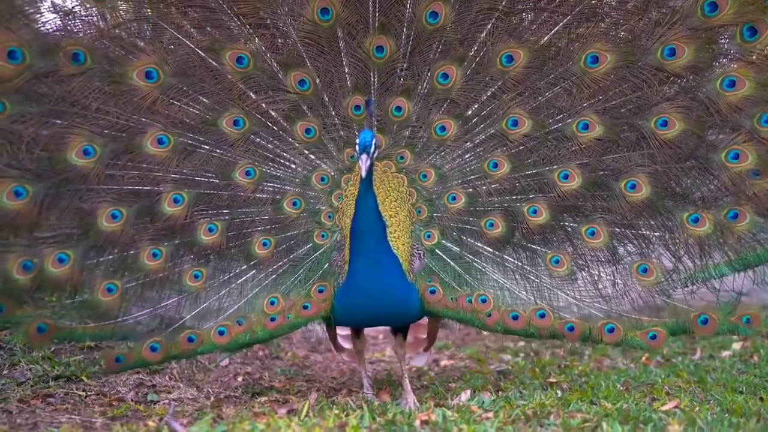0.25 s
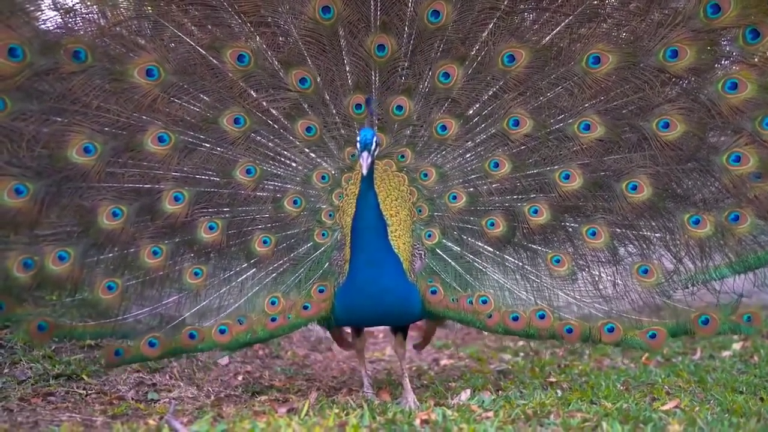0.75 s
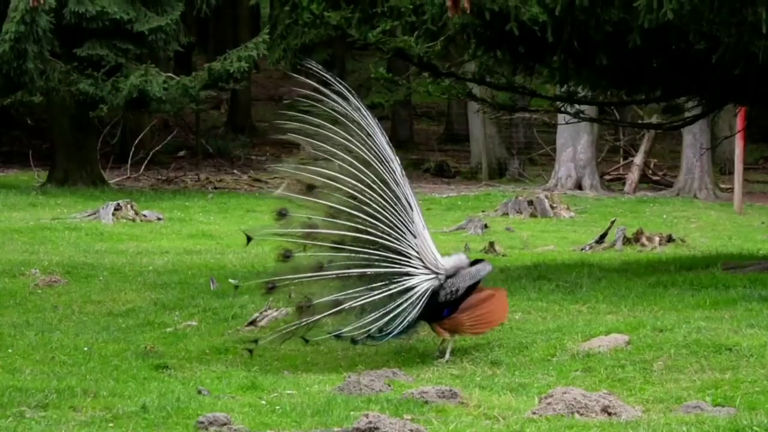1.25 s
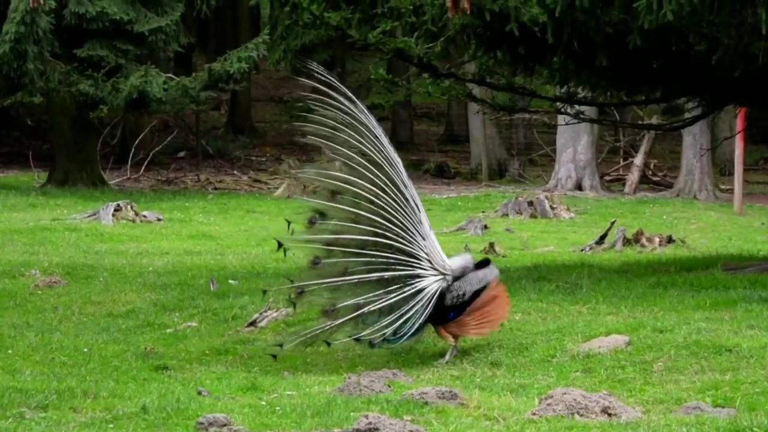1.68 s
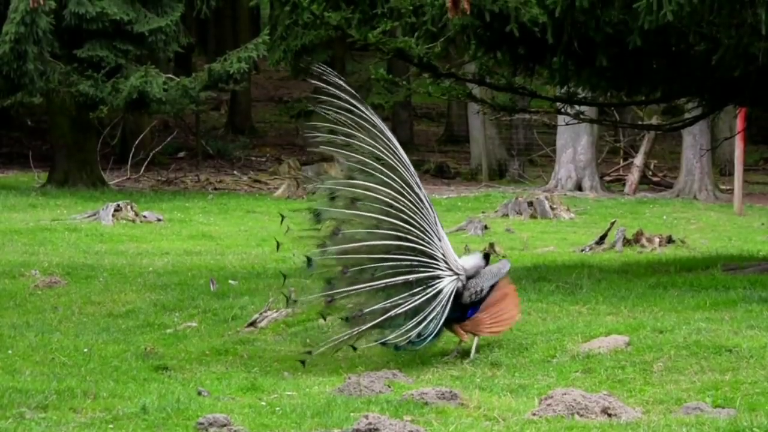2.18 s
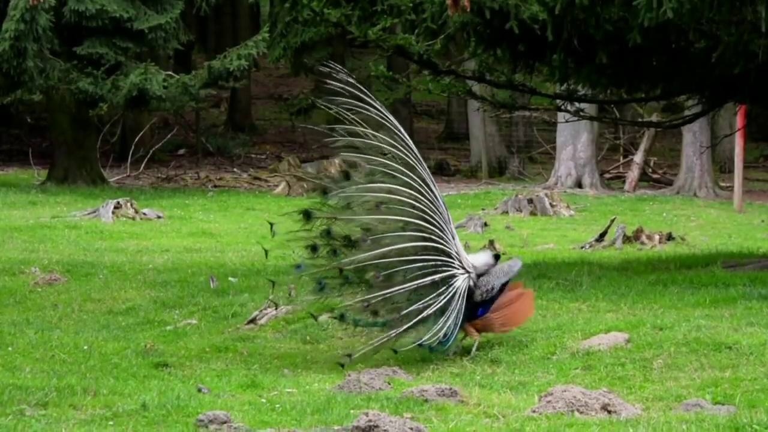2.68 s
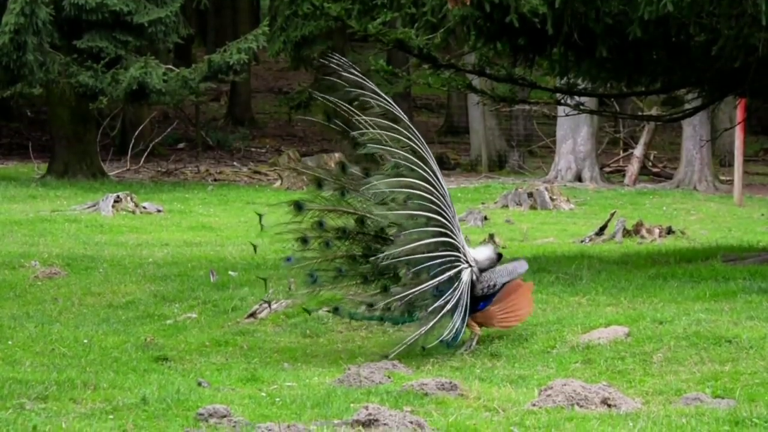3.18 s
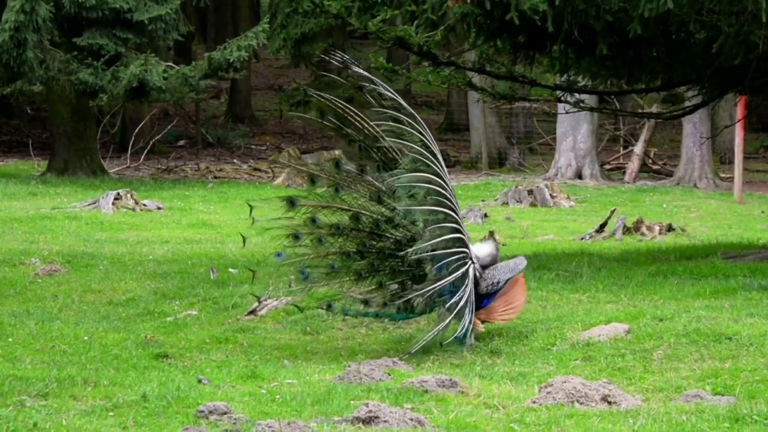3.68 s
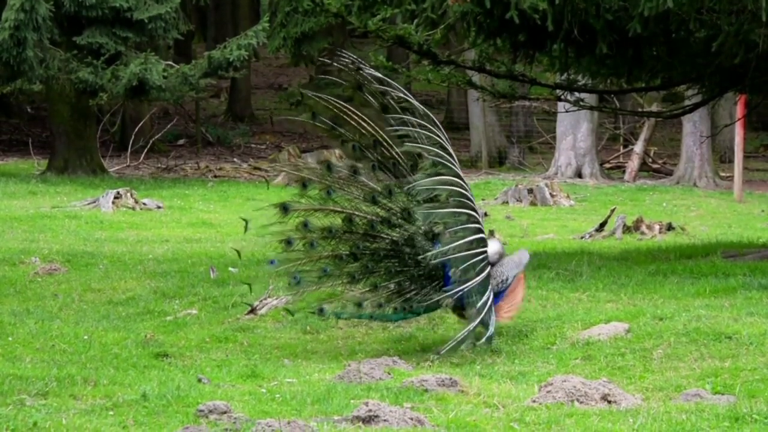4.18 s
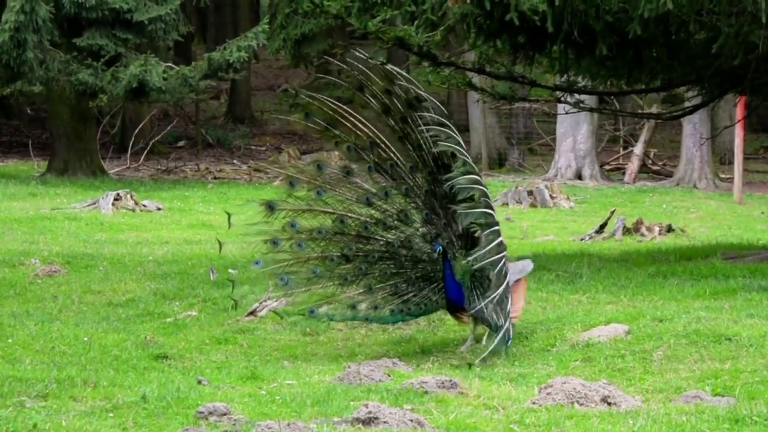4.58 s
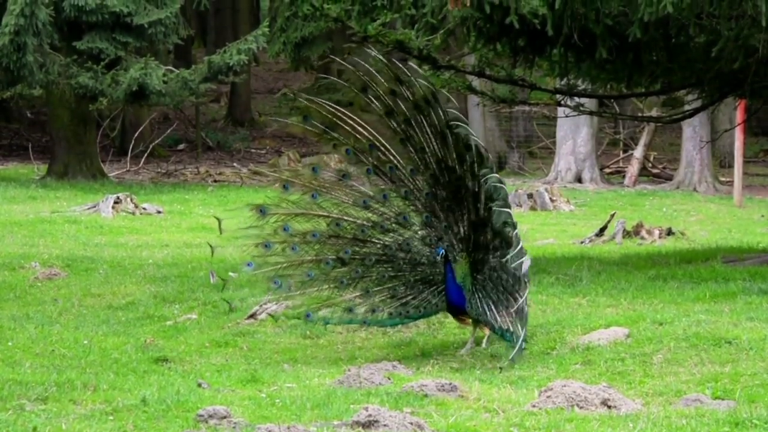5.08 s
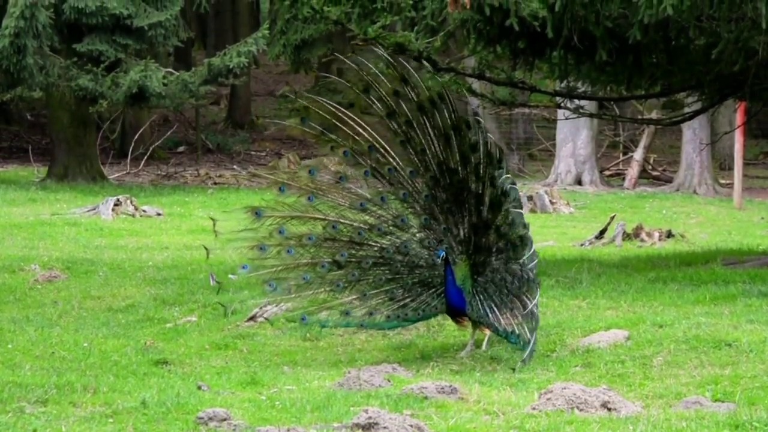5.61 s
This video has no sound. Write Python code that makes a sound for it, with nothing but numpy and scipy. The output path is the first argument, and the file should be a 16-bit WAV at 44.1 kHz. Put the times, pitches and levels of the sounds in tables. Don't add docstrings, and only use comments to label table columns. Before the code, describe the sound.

Close, centred peacock calls dominate: one long fluttering wail, four separate nasal yelps, then another wail trailing into hoarseness. A long, thin woodland echo follows each. Much quieter, slightly left, other peafowl call far away and small birds give reedy peeps and thin chirps. Soft wide traffic rumble and stirring leaves fill the open-air background.

```python
import sys
import numpy as np
from scipy import signal
from scipy.fft import rfft, irfft
from scipy.io import wavfile

SR = 44100
rng = np.random.default_rng(int(sys.argv[2]) if len(sys.argv) > 2 else 0)


def ratio_of_db(decibels):
    return 10 ** (np.asarray(decibels, float) / 20)


def unload_audio(sound):
    columns = np.transpose(np.atleast_2d(sound))
    steps = np.round(np.clip(columns, -1, 1) * 32767)
    wavfile.write(sys.argv[1], SR, steps.astype(np.int16))


N = 257984
T = np.arange(N) / SR


def rms1(x):
    return x / np.sqrt(np.mean(x ** 2))


def modes(hz, table):
    return sum(ratio_of_db(db) / (1 + (2 * (hz - f) / w) ** 2) for f, w, db in table)


def coloured(gain_at):
    spectrum = rfft(rng.standard_normal(N))
    return rms1(irfft(spectrum * gain_at(np.fft.rfftfreq(N, 1 / SR)), N))


def resonant_noise(table):
    return coloured(lambda f: modes(f, table))


def walk(rate_hz):
    return coloured(lambda f: 1 / (1 + (f / rate_hz) ** 2))


def bumps(rows):
    return sum(size * np.exp(-((T - s) / width) ** 2) for s, size, width in rows)


def read(table, fade_s=0.0023):
    s, *columns = np.transpose(table)
    span = slice(int(s[0] * SR), int(s[-1] * SR))
    t = T[span]
    gate = np.clip(np.minimum(t - s[0], s[-1] - t) / fade_s, 0, 1)
    return span, gate, [np.interp(t, s, c) for c in columns]


def running_phase(hz):
    return 2 * np.pi * np.cumsum(hz) / SR


# (time [s], pitch [Hz], level [dB], beak opening [dB], membrane slack [0-1])
WAIL_CONTOURS = [
    [(.017, 721, -8.5, -6, 1), (.07, 699, -10.5, -6.5, .15), (.13, 687, -11, -4, 0.17),
     (.39, 692.3, -13.5, 3.5, 0.19), (.6, 668, -13.5, 0, .45), (.7, 658, -13, -8.5, 1),
     (.88, 638.3, -14, -6, 0.97), (.97, 618.5, -23.5, -3, 0.94), (1.0, 620, -53.5, -12, 0.4)],
    [(3.56, 674, -26, -12, 0.6), (3.62, 709.7, -12, 0, 0.25), (3.85, 716, -14, 6, 0.01),
     (4.03, 708.1, -13, 4, 0.06), (4.27, 679.2, -14, -1, 0.73), (4.5, 645, -28, -1, 0.76),
     (4.74, 666, -31, -5, 0.89), (4.85, 657, -45, 3, 0.95), (5.06, 664, -54, 16, 0.86)],
]
# (multiple of pitch, level [dB])
WAIL_PARTIALS = [
    [(1, -13), (2, 0), (3, -35), (4, -20), (5, -30), (6, -29), (7, -40), (8, -37), (9, -42), (10, -37),
     (11, -49), (12, -45), (13, -37), (14, -61), (15, -34), (16, -33), (17, -41), (18, -43), (19, -41),
     (20, -39), (21, -36)],
    [(1, -14), (2, 0), (3, -28), (4, -16), (5, -21), (6, -21), (7, -23), (8, -33), (9, -29), (10, -25),
     (11, -30), (12, -38), (13, -33), (14, -49), (15, -51), (16, -59), (17, -58), (18, -67)],
]
# (first partial [dB], upper [dB], top [dB], beak share in first [0-1], in top [0-1])
WAIL_BALANCE = [(-14.5, -19.5, -21.5, 0.82, 0.03), (-18.5, -21, -23.5, 0.74, 0.75)]
# (slack pull [side lines], taut fall-off [dB/line], slack fall-off [dB/line],
#            taut hoarseness [0-1], slack hoarseness [0-1])
SLACK_LAWS = [(.75, 32, 7, .04, .06), (.65, 20, 2, .02, .25)]
PITCH_SWING = [.09, 0.15]
# (time [s], depth [dB], width [s])
VOICE_CATCHES = [(3.665, 2.5, 0.026), (3.93, 7.5, 0.02), (4.195, 5.5, 0.059), (4.34, 2.5, 0.037)]
# (centre [Hz], width [Hz], level [dB])
WINDPIPE = [(1240, 120, 11), (1857, 83, 7.5), (2583, 190, 12), (3000, 160, -5), (5280, 117, 5)]


def wail(i, flutter_start_rad, upper_hiss_db, top_hiss_db, breath_db, tones):
    span, gate, (hz, level_db, open_db, slack) = read(WAIL_CONTOURS[i])
    first_db, upper_db, top_db, first_share, top_share = WAIL_BALANCE[i]
    first_db = level_db + first_db + first_share * open_db
    upper_db = level_db + upper_db + open_db
    top_db = level_db + top_db + top_share * open_db

    slack_pull, taut_db, slack_db, taut_hoarse, slack_hoarse = SLACK_LAWS[i]
    taut_pull = .15
    pull = taut_pull + (slack_pull - taut_pull) * slack
    fall_db = np.clip(taut_db + (slack_db - taut_db) * slack, 1, 60)
    hoarse = np.clip(taut_hoarse + (slack_hoarse - taut_hoarse) * slack, 0, 1)

    settled_hz, extra_hz, settle_s = 44.53, 9.45, 0.275
    flutter_hz = settled_hz + extra_hz * np.exp(-(T[span] - T[span][0]) / settle_s)
    flutter = running_phase(flutter_hz) + flutter_start_rad + 4.7 * hoarse * walk(6.9)[span]
    phase = running_phase(hz) + hoarse * walk(33)[span]

    sides = np.arange(-4, 3)[:, None]
    waver_db = 25 * hoarse * np.array([walk(33)[span] for _ in sides])
    gain = ratio_of_db(-fall_db * (sides + pull) ** 2 + waver_db) + ratio_of_db(-34)
    second = np.sum(gain * np.sin(2 * phase + sides * flutter), axis=0)
    second = second / np.sqrt(np.sum(gain ** 2, axis=0))
    first = (1 + 0.21 * np.cos(flutter + 1.64)) * np.sin(phase + 0.033 * np.sin(flutter))

    groups = np.zeros((3, len(hz)))
    for k, k_db in WAIL_PARTIALS[i][2:]:
        throb = (1 + 0.38 * np.cos(flutter + 0.47 * k)) * ratio_of_db(3.86 * walk(4)[span])
        dull_db = 3 * slack * max(k - 4, 0)
        swung = k * phase + PITCH_SWING[i] * k * np.sin(flutter) + k * k
        groups[int(k > 3) + int(k > 10)] += ratio_of_db(k_db - dull_db) * throb * np.sin(swung)

    puffs = 1 + 0.55 * np.cos(flutter)
    upper_hiss = puffs * resonant_noise([(3000, 2300, -17), (5350, 1700, 4)])[span]
    top_hiss = puffs * resonant_noise([(12600, 3500, 0)])[span]
    upper_hiss_gain = ratio_of_db(upper_hiss_db) + 4 * hoarse ** 2 + .45 * np.clip(pull - .4, 0, 1)
    upper = rms1(groups[1]) + upper_hiss_gain * upper_hiss
    top = np.clip(1.2 - 2 * pull, .1, 1) * rms1(groups[2]) + ratio_of_db(top_hiss_db) * top_hiss
    breath = ratio_of_db(breath_db) * (1 + 8 * hoarse) * resonant_noise(WINDPIPE)[span]

    second_db = level_db - bumps(VOICE_CATCHES)[span]
    low = ratio_of_db(second_db) * (np.sqrt(2) * (second + groups[0]) + breath)
    low = low + np.sqrt(2) * ratio_of_db(first_db) * first
    fluttered_tones = (1 + 0.052 * np.cos(flutter)) * tones[span]
    high = ratio_of_db(upper_db + 0.9) * upper + ratio_of_db(top_db) * (ratio_of_db(-8.0) * top + fluttered_tones)
    out = np.zeros(N)
    out[span] = (low + high) * gate
    return out


# (centre [Hz], width [Hz], level [dB])
THROAT_MODES = [(760, 1700, -4.5), (1240, 163, 4), (1816, 177, 5), (2067, 117, 7.5), (2369, 214, 7),
                (2677, 63, 5.5), (3130, 315, -3.5), (3570, 136, -8.5), (4190, 404, -12)]
# (centre [Hz], width [Hz], depth [dB])
THROAT_POCKETS = [(1975, 90, 7.5), (3475, 120, 7), (4850, 220, 4)]
# (centre [Hz], width [Hz], level [dB])
BEAK_MODES = [(5320, 880, 9.5), (7000, 200, -18), (9860, 1900, 5), (11260, 2600, 3.5), (13560, 860, 16.5)]
# (time [s], drop [Hz], width [s])
FIRST_YELP_STALL = (1.685, 32, .045)


def yelp(start, top, end, top_hz, level_db, tones):
    span, gate, (away,) = read([(start, -1), (top, 0), (end, 1)])
    drop_hz = np.where(away < 0, 128.6, 149.2)
    flat, bend = 0.17, 1.5
    arch = np.clip((np.abs(away) - flat) / (1 - flat), 0, 1) ** bend
    hz = top_hz - drop_hz * arch - bumps([FIRST_YELP_STALL])[span]

    sink_db = 3 * np.clip((hz - 640) / 42.3, 0, 1)
    treble_db = -21.5 + .7 * sink_db
    age_s, left_s = T[span] - start, end - T[span]
    attack_db, release_db = 17.5 * np.exp(-age_s / 0.0088), 22 * np.exp(-left_s / 0.023)
    db = level_db - sink_db - 5.5 * age_s - attack_db - release_db

    k = np.arange(1, 27)[:, None]
    jitter = 0.0008 + 0.008 * np.clip((685 - hz) / 120, 0, 1)
    phase = running_phase(hz * (1 + jitter * walk(45)[span]))
    rasp_db = .75 * k.clip(0, 6) * np.clip((700 - hz) / 110, .1, 1)
    rasp = ratio_of_db(rasp_db * np.array([walk(50)[span] for _ in k]))
    pocket_db = sum(d * np.exp(-((k * hz - f) / w) ** 2) for f, w, d in THROAT_POCKETS)
    low_gain = rasp * modes(k * hz, THROAT_MODES) * ratio_of_db(-pocket_db)
    beak_waver = ratio_of_db(4.3 * np.array([walk(27)[span] for _ in k]))
    beak_share = np.where(k * hz > 8500, 1, .28) * (k * hz > 4800)
    high_gain = modes(k * hz, BEAK_MODES) * beak_share * beak_waver

    def voiced(gain):
        total = np.sum(gain * np.sin(k * phase + 0.28 * k * k), axis=0)
        return np.sqrt(2) * total / np.sqrt(np.sum(gain ** 2, axis=0))

    low, high = voiced(low_gain), voiced(high_gain)
    slack = np.clip((705 - hz) / 170, .2, .7)
    hiss = coloured(lambda f: modes(f, BEAK_MODES) * (f > 4500))[span] * (1 + .5 * np.cos(phase))
    sibilance = resonant_noise([(6460, 1700, 0)])[span] * (1 + np.cos(phase))
    treble = np.sqrt(1 - slack ** 2) * high + slack * hiss + 0.9 * slack * sibilance
    breath = ratio_of_db(-27) * resonant_noise(WINDPIPE)[span]
    breath = breath + ratio_of_db(-17) * (slack - .18) ** 2 * resonant_noise(THROAT_MODES)[span]
    beak_puff = ratio_of_db(-22.5) * np.exp(-np.arange(len(hz)) / SR / 0.029)
    beak_puff = beak_puff * resonant_noise([(284, 480, 0)])[span]

    sound = low * ratio_of_db(0.28 * walk(68)[span]) + ratio_of_db(treble_db) * treble + breath
    out = np.zeros(N)
    out[span] = (sound + tones[span] + beak_puff) * ratio_of_db(db) * gate
    return out


# (pitch [Hz], level under first wail [dB], under yelps [dB], under second wail [dB])
STEADY_HIGH_TONES = [(14643, -6, -29, -50), (10853, -13, -60, -50), (8996, -20, -60, -15),
                     (13264, -16, -60, -50), (5280, -15, -60, -40), (8292, -26, -60, -20),
                     (6850, -19, -60, -50), (10347, -16, -60, -50), (14002, -16, -60, -50)]


def steady_high_tones(column):
    return sum(ratio_of_db(row[column]) * np.sqrt(2) * np.sin(2 * np.pi * row[0] * T) for row in STEADY_HIGH_TONES)


# (start [s], middle of arch [s], end [s], top pitch [Hz])
YELP_TIMES = [
    (1.497, 1.765, 1.895, 668),
    (2.102, 2.288, 2.475, 690),
    (2.648, 2.85, 3.04, 698),
    (3.228, 3.425, 3.63, 706),
]
YELP_LEVELS = [-13.5, -13.5, -13.5, -18]


def peacock():
    out = wail(0, flutter_start_rad=0.24, upper_hiss_db=-22, top_hiss_db=-4, breath_db=-31,
               tones=steady_high_tones(1))
    out = out + wail(1, flutter_start_rad=0.14, upper_hiss_db=-34, top_hiss_db=-34, breath_db=-40,
                     tones=steady_high_tones(3))
    yelp_tones = steady_high_tones(2)
    for times, level_db in zip(YELP_TIMES, YELP_LEVELS):
        out = out + yelp(*times, level_db, yelp_tones)
    return out


def trees(x, near_db, wide_db, far_db):
    t = T[:int(2.5 * SR)]
    dull = signal.butter(2, 3200, fs=SR, output="sos")
    decay_s = np.array([[.25], [.08]])
    mid, side = rng.standard_normal((2, len(t))) * ratio_of_db(-60 * t / decay_s)
    far = signal.sosfilt(dull, rng.standard_normal((2, len(t))))
    far = far * ratio_of_db(-60 * t / 2.0) * (1 - np.exp(-t / 0.9))
    wide = side * np.array([[1], [-1]])
    parts = (mid, near_db), (wide, wide_db), (far + 2.7 * far[::-1], far_db)
    echo = sum(ratio_of_db(db) * rms1(r) for r, db in parts) / np.sqrt(len(t))
    return signal.fftconvolve(x[None], echo, axes=1)[:, :N]


def stack(hz, partial_db, wobble_db, blur):
    out = 0
    for k, db in enumerate(partial_db):
        phase = running_phase(hz) + blur * walk(50)[:len(hz)]
        out = out + ratio_of_db(db + wobble_db * walk(18.0)[:len(hz)]) * np.sin((k + 1) * phase + k)
    return np.sqrt(2) * out


# (start [s], top of arch [s], end [s], top pitch [Hz], level [dB])
FAR_CALLS = [
    (5.33, 5.47, 5.8, 653, -40),
    (5.05, 5.32, 5.62, 622, -41),
    (3.9, 4.28, 4.31, 622, -31),
    (1.95, 2.09, 2.12, 668, -48),
]
FAR_PARTIALS = [
    [-8, -1.5, -22, -26],
    [-15, -38, -9, -12, -18, -16.5],
    [-38, -32, -19, -19],
    [-7.5, -16, -3, -31],
]


def far_peafowl():
    out = np.zeros(N)
    for (start, top, end, top_hz, top_db), partial_db in zip(FAR_CALLS, FAR_PARTIALS):
        span, gate, (away_s,) = read([(start, start - top), (end, end - top)], fade_s=0.033)
        hz = top_hz - 466.7 * away_s ** 2
        db = top_db - np.where(away_s < 0, 6, 49) * np.abs(away_s)
        out[span] += stack(hz, partial_db, wobble_db=2.2, blur=.1) * ratio_of_db(db) * gate
    return out


# (start [s], pitch [Hz], length [s], level [dB])
REEDY_PEEPS = [
    (1.977, 1300, 0.026, -56),
    (2.062, 1284, 0.14, -61),
    (5.078, 1215, 0.055, -50),
    (5.197, 1240, 0.062, -49),
    (5.271, 1240, 0.089, -52),
    (5.63, 1246, 0.061, -49.5),
    (5.764, 1277, 0.086, -51.5),
]
PEEP_PARTIALS = [-7, 2, 3.5, 2.5, -0.5, -6.5]


def peeps():
    out = np.zeros(N)
    for s, hz, length_s, db in REEDY_PEEPS:
        contour = [(s, .99 * hz, db), (s + 0.018, hz, db - 5), (s + length_s, hz, db - 18.0)]
        span, gate, (pitch_hz, fall_db) = read(contour, fade_s=0.0009)
        out[span] += stack(pitch_hz, PEEP_PARTIALS, wobble_db=3.0, blur=0.23) * ratio_of_db(fall_db) * gate
    return out


# (start [s], from [Hz], to [Hz], length [s], level [dB])
THIN_CHIRPS = [
    (1.387, 7000, 6220, 0.072, -83),
    (4.66, 6510, 7270, 0.04, -57),
    (4.891, 6450, 7300, 0.057, -54.5),
    (5.119, 6340, 7220, 0.054, -54.5),
    (5.352, 6570, 7000, 0.081, -59),
    (5.535, 5815, 5810, 0.093, -58),
    (5.618, 2920, 2900, 0.085, -51.5),
    (4.97, 2930, 2900, 0.167, -57),
]


def chirps():
    out = np.zeros(N)
    for s, from_hz, to_hz, length_s, db in THIN_CHIRPS:
        span, gate, (pitch_hz,) = read([(s, from_hz), (s + length_s, to_hz)], fade_s=0.011)
        out[span] += stack(pitch_hz, [db], wobble_db=5.5, blur=0.55) * gate
    return out


# (frequency [Hz], level [dB/Hz])
HUM_SPECTRUM = [(15, -68), (25, -14.5), (126, -2), (399, -11), (703, -9.5), (1110, -12), (1270, -40),
                (1490, -17.5), (2060, -18), (13500, -33), (15500, -64)]
# (time [s], swell [dB], width [s])
VEHICLE_PASSES = [(1.5, 2.5, 0.34), (4.3, 3, 0.62)]


def hum():
    f, db = np.transpose(HUM_SPECTRUM)
    mid, side = (coloured(lambda hz: ratio_of_db(np.interp(np.log(hz + 1), np.log(f), db))) for _ in range(2))
    both = mid + ratio_of_db(-5) * side * np.array([[1], [-1]])
    rumble_band = signal.butter(1, [170, 1500], "bandpass", fs=SR, output="sos")
    rumble = signal.sosfiltfilt(rumble_band, both)
    leaves = signal.sosfiltfilt(signal.butter(1, 2500, "highpass", fs=SR, output="sos"), both)
    ebb_db = 8.5 * np.clip(T - 4.68, 0, None)
    rumble_db = -3 + bumps(VEHICLE_PASSES) - ebb_db
    gust_db = 2.5 * np.cos(2 * np.pi * 0.47 * (T - 1.93))
    leaves_db = -0.5 - 30 * np.exp(-T / 0.79) + gust_db
    return ratio_of_db(-45.5) * (both + (ratio_of_db(rumble_db) - 1) * rumble + (ratio_of_db(leaves_db) - 1) * leaves)


def scene():
    bird = peacock()
    others = far_peafowl() + peeps() + chirps()
    left_right_db = np.array([[3], [-4]])
    background = others * ratio_of_db(left_right_db) + trees(others, near_db=-3, wide_db=-8, far_db=-20)
    return bird + trees(bird, near_db=-18.5, wide_db=-17, far_db=-35.5) + background + hum()


def top_cut(x):
    return signal.sosfilt(signal.butter(12, 16820, fs=SR, output="sos"), x)


def record(dry):
    lowpass = signal.ellip(6, .3, 45, 15200, fs=SR, output="sos")
    mix = signal.sosfilt(lowpass, dry) * (T > .0165)
    return top_cut(mix)


dry = scene()
out = record(dry)
unload_audio(out)
```